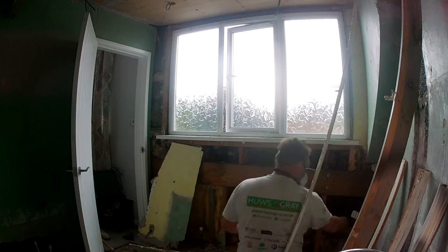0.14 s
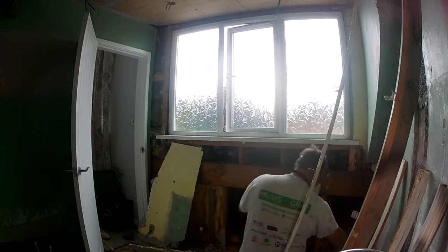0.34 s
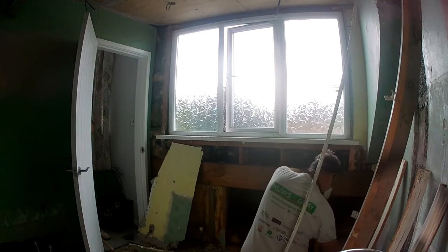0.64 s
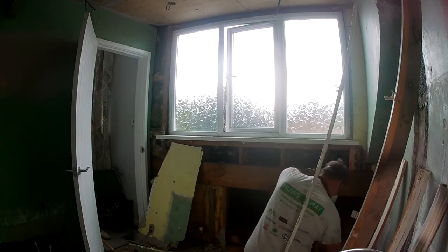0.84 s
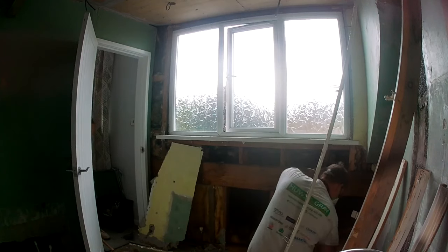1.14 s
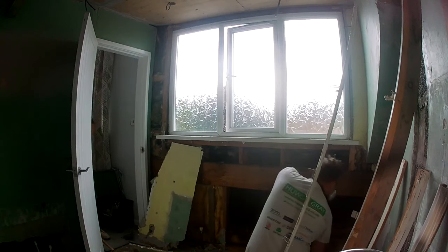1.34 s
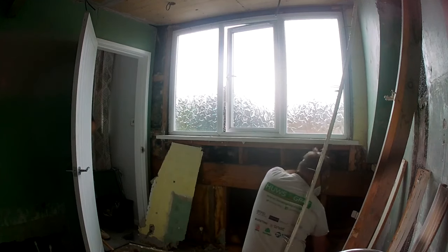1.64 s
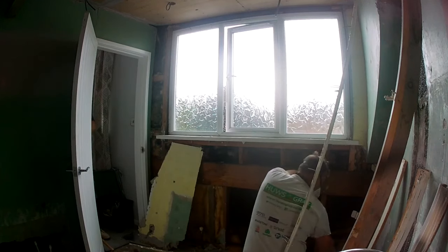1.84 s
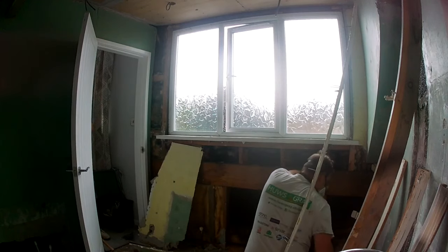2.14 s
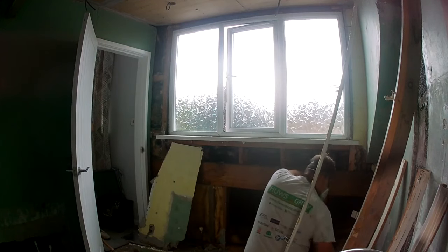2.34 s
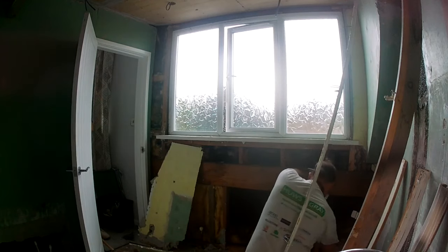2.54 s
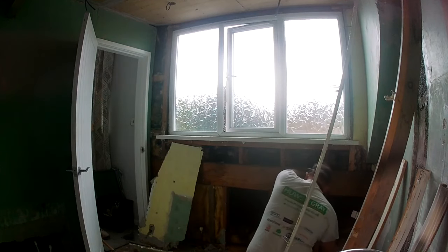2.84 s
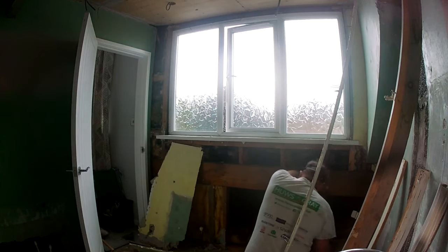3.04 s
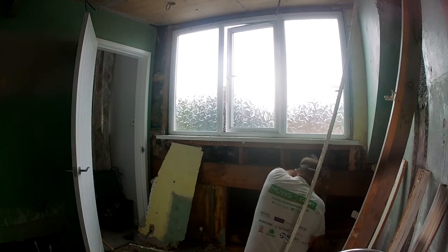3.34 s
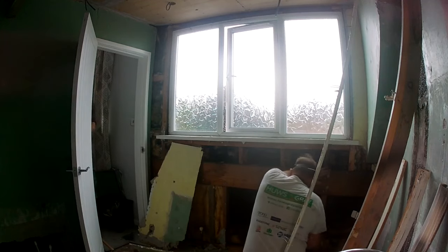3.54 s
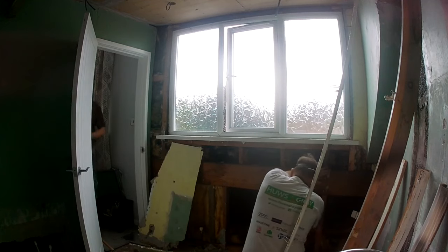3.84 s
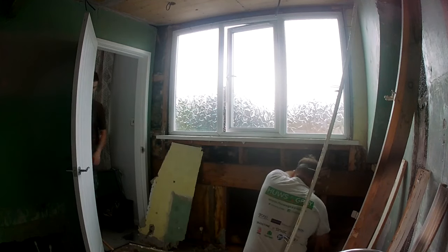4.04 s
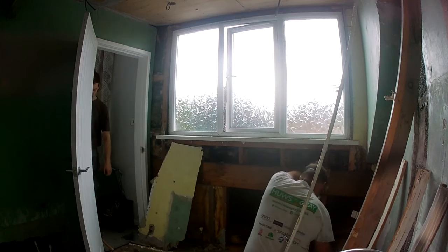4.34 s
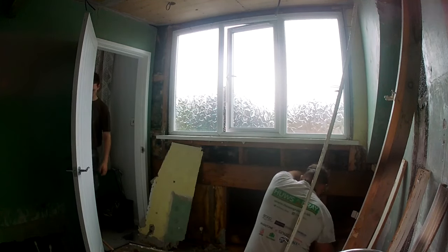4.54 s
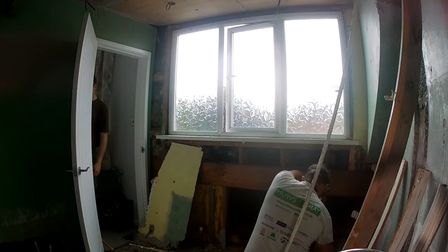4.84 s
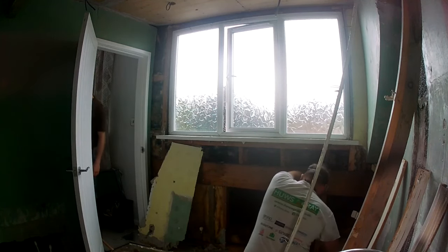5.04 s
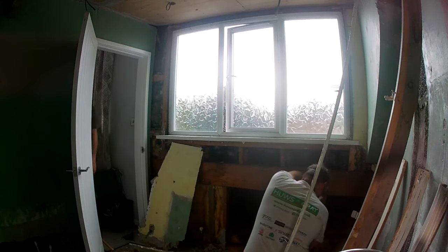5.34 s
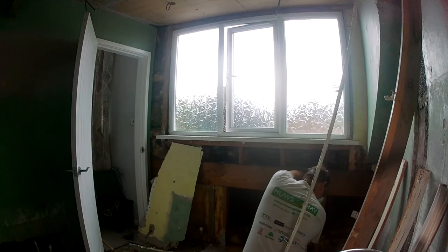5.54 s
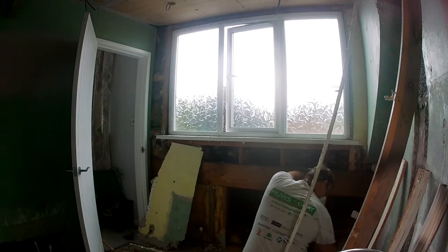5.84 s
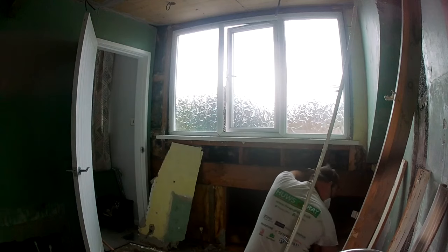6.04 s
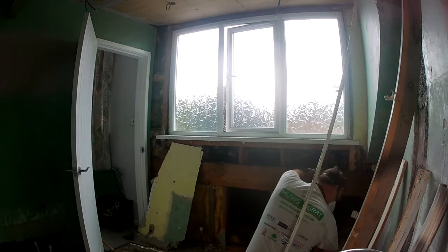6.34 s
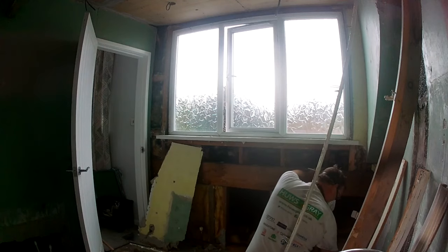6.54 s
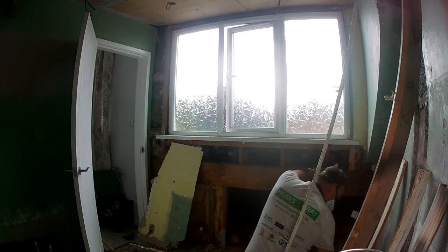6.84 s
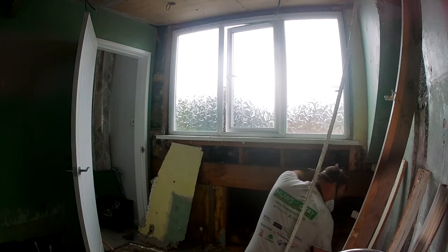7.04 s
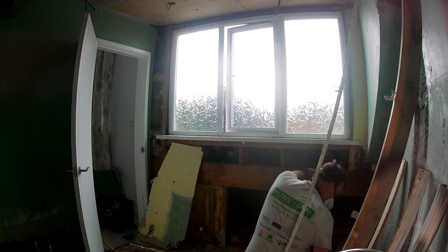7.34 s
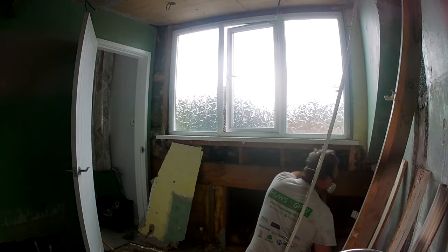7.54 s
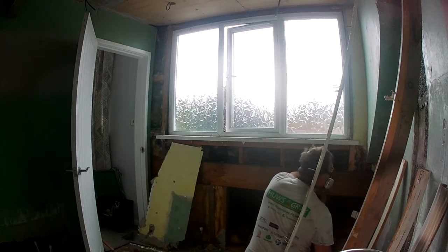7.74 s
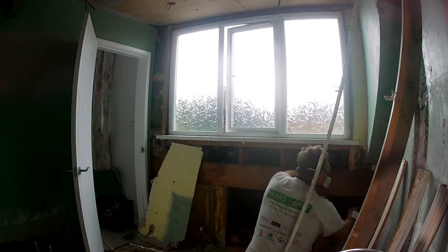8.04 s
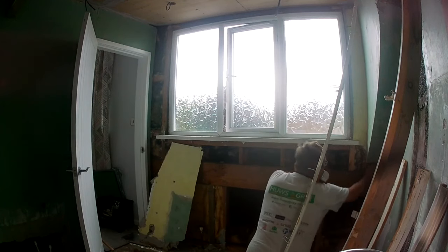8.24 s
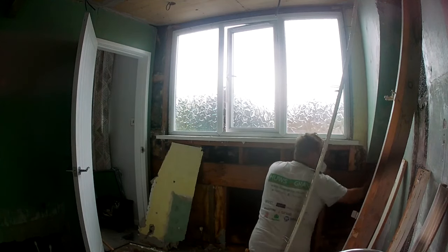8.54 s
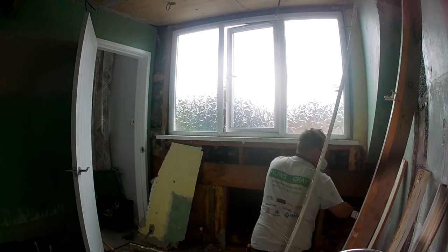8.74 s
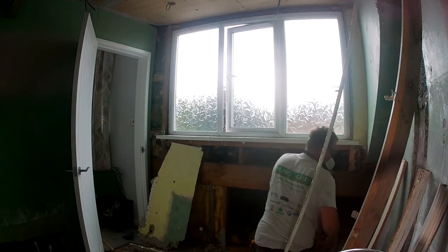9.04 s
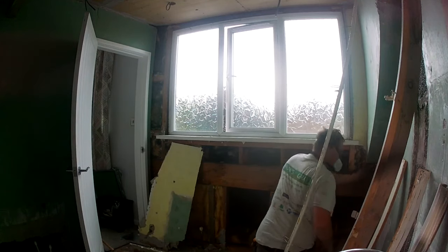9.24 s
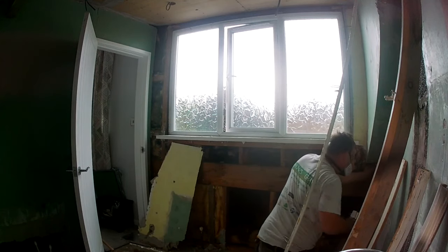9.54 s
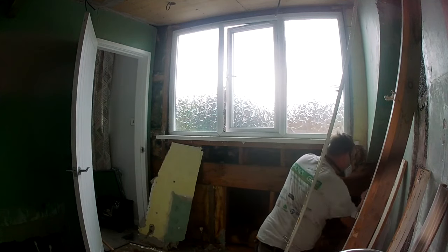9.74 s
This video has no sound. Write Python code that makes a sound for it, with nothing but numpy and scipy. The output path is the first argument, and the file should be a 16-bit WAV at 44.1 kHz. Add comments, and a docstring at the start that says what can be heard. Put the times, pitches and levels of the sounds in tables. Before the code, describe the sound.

Old wooden boards are knocked and pried loose in a bare room, with irregular dry thuds, cracks, short scrapes and quiet gaps.

```python
"""Prying old boards off a wall

Old boards are pried off a wall, knocked about and dragged in a bare room under renovation.
Modal synthesis: knocks, thumps and scrapes drive one set of decaying timber modes; filtered noise
adds cracks and grit. Squeaks ring single resonances, and noise tails make the room's reflections.
A closed microphone housing adds one treble resonance."""
import sys
import numpy as np
from scipy import signal
from scipy.fft import rfft, irfft, next_fast_len
from scipy.io import wavfile
from scipy.ndimage import uniform_filter1d

SR = 44100
rng = np.random.default_rng(int(sys.argv[2]) if len(sys.argv) > 2 else 0)


def file_out(sig):
    """Save sig as 16-bit WAV at sys.argv[1]."""
    # one column per channel
    cols = np.atleast_2d(sig).T
    # limit, then scale
    lim = np.clip(cols, -1, 1)
    pcm = np.round(lim * 32767).astype(np.int16)
    wavfile.write(sys.argv[1], SR, pcm)


def invert_db(level):
    """Linear amplitude ratio for a level in decibels (20 dB per decade), elementwise."""
    return 10 ** (np.asarray(level, dtype=float) / 20)


N = 436590

# Knocks on the boards: (time [s], strength [dB], pitch of the struck spot [Hz],
# crack [dB re strength], after-shudder [dB re strength])
KNOCKS = [(0.012, -30, 640, -15, -3), (0.017, -30, 1520, -12, -1), (0.089, -15, 1110, -20.5, -1),
          (0.226, -32, 1140, -14, -8), (0.267, -25, 1510, -25, -17.5), (0.288, -29, 1620, -14, -7),
          (0.463, -40.5, 1540, -10, 4), (0.478, -39, 1750, -8, -6), (0.515, -53, 1510, -18, -12),
          (0.615, -46.5, 1420, -1, 0), (0.998, -56, 584, -1, 9), (1.25, -42.5, 950, -17.5, 1.5),
          (1.337, -54.5, 503, -5, 2.5), (1.636, -51.5, 600, -1, 10), (1.684, -25, 1390, -14, -8),
          (1.696, -23.5, 870, -17, -6.5), (1.75, -35.5, 1550, -22, -16), (1.879, -37.5, 774, -21, -19),
          (2.075, -56, 805, -4, -12), (2.141, -48.5, 540, -16, 1), (2.203, -43.5, 714, -15, -1.5),
          (2.448, -56.5, 596, -44, -13), (2.615, -41.5, 1100, -24, 2), (2.782, -52, 900, -15, -1),
          (2.82, -55, 850, -3, -3), (2.845, -53, 1300, -12, -5), (3.139, -45, 1200, -3.5, -6),
          (3.172, -42.5, 600, -8, -17), (3.413, -62.5, 676, 10, -12), (3.524, -19.5, 1460, -3.5, -1),
          (3.548, -35, 1200, 1.5, -11), (3.578, -35, 1000, -4, -3), (3.6, -28, 900, -13, 1.5),
          (3.642, -19.5, 870, -11.5, -1), (3.662, -29, 1350, -12, 4.5), (3.708, -41, 1200, -19, -5),
          (3.733, -38, 800, -16, -9), (3.69, -29, 890, -24.5, 1), (4.296, -45, 1270, -6.5, -10),
          (4.469, -49, 563, -20, -3), (4.548, -35.5, 560, -17, -1.5), (4.634, -49, 1200, -12, 3),
          (4.604, -49, 593, -7, -10), (4.992, -38.5, 530, -10, -9), (5.017, -52, 600, -18, -10),
          (5.235, -52.5, 1380, -7.5, -4), (5.312, -54, 626, -3.5, -14), (5.667, -28.5, 710, -3, 1),
          (5.698, -13, 900, -8, 0.5), (5.707, -28.5, 1300, 3.5, -8), (5.715, -14, 930, -23, -8.5),
          (5.745, -21.5, 930, -27, 0), (5.96, -38, 500, -27, -9), (6.59, -45.5, 1360, -4, -2.5),
          (7.069, -47, 800, -2, 2), (7.167, -40, 900, -8, -8), (7.19, -35, 1500, -11, -8),
          (7.767, -49, 742, -19, -10), (7.784, -52.5, 566, -28.5, -9.5), (7.949, -49, 620, -26.5, 0),
          (7.978, -51, 570, -30, -7), (8.198, -59.5, 567, -1.5, -10), (8.347, -48, 535, -5.5, 2),
          (8.447, -51.5, 850, -3, -6), (8.528, -61, 1030, -10, 11), (8.61, -35.5, 610, -34, -16),
          (8.878, -33, 1300, -4.5, -14), (8.885, -33.5, 1000, -12.5, -12), (8.946, -38.5, 1110, 2, 0),
          (8.992, -32, 1450, -1, -12), (9.005, -38, 700, -9, -13), (9.045, -27, 670, -16.5, -3),
          (9.063, -28.5, 740, -13, -10), (9.108, -23.5, 690, -4.5, -9.5), (9.16, -26, 666, -35, 0.5),
          (9.254, -45, 620, -27, 8), (9.292, -40.5, 555, -3.5, -4), (9.398, -44.5, 544, -4, -1),
          (9.476, -29, 740, -21, -18), (9.644, -44, 845, -8.5, -26.5)]
# Thumps of timber into frame and floor: (time [s], strength [dB], deep thud [dB re strength],
# after-shudder [dB re strength], shudder t60 [s])
THUMPS = [(0.011, -25.5, -4.5, -0.5, 0.31), (0.085, -23.5, 1, 4, 0.28), (0.24, -30, -2, -9.5, 0.2),
          (0.267, -48, -12, -13, 0.18), (1.239, -41, 6.5, 4.5, 0.3), (1.333, -40.5, 2.5, -3.5, 0.38),
          (1.494, -36, -8, -3.5, 0.38), (1.532, -38, -10, -5.5, 0.22), (1.637, -31.5, 1, 1, 0.27),
          (1.682, -12, -11, -16, 0.19), (1.697, -13.5, -5.5, -21, 0.19), (1.8, -34, 2, -5, 1),
          (2.613, -29.5, 1, -3, 0.35), (2.739, -54, -22, 7.5, 0.37), (3.362, -67.5, 20, -31, 0.24),
          (3.528, -17, 4, 2.5, 0.4), (3.59, -24, 1.5, 5, 0.3), (3.715, -27, -2, 4, 0.27),
          (3.545, -28, 5, -10, 0.33), (3.635, -18.5, -9, 4.5, .3), (3.66, -18, -12, 3, 0.32),
          (3.759, -32, -1, -3, 0.25), (3.829, -24.5, -5.5, 5, 0.12), (4.055, -60, 23.5, -2, 0.38),
          (4.11, -60, 23, -6, 0.15), (4.41, -53, 8, -2, 0.2), (4.453, -35.5, 0, -1.5, 0.41),
          (4.509, -40, 5.5, 5.5, 0.37), (4.547, -35.5, 4.5, 6.5, 0.3), (4.605, -28.5, -7, -8, 0.16),
          (4.806, -47, -2, 6.5, 0.37), (4.86, -34, -4, -2.5, 0.35), (4.885, -48, 11.5, 6, 0.48),
          (4.992, -29, 3.5, -6, 0.31), (5.017, -32, 4, 1, 0.29), (5.667, -21.5, 1, 2.5, 0.51),
          (5.699, -16.5, -9, 3.5, 0.3), (5.747, -19, -10, -5, 0.12), (5.87, -38, 5, 4, 0.45),
          (5.959, -35, 0.5, 8, 0.21), (6.0, -40.5, 1, -3, 0.16), (6.098, -60, 5, 1, 0.18),
          (6.448, -43.5, 3.5, -20, 0.26), (7.049, -42.5, -12, 4, 0.68), (7.162, -39, -7, 2, .3),
          (7.282, -31.5, -21.5, 2.5, 0.22), (8.531, -49, 1.5, -2, 0.96), (8.697, -61, 1, 3, .6),
          (8.883, -47, -34, 6.5, 0.41), (9.048, -44, -20, 1, .15), (9.107, -35, 2, 7, 0.17)]
# Scrapes, drags and creaks: (start [s], length [s], top [dB], heft [dB re top], grit [dB re top])
SCRAPES = [(0.14, 0.2, -49, -7, 5.5), (0.31, 0.32, -57, -2, 11), (0.6, 0.068, -50.5, -4, -2),
           (1.33, 0.42, -52.5, 3.5, -9), (1.74, 0.3, -41.5, 11, -11), (1.839, 0.14, -42.5, 15, -5),
           (2.05, 0.17, -47, -19, -11), (2.699, 0.27, -54, -4, -2), (2.81, 0.29, -52.5, -17, -4),
           (3.13, 0.19, -54, 5.5, -15), (3.451, 0.5, -51, -1, 5.5), (3.54, 0.2, -23, -7, -6),
           (3.64, 0.12, -28.5, 7, -14), (3.719, 0.22, -34, 7.5, -15.5), (4.29, 0.32, -46.5, -10.5, -1.5),
           (4.44, 0.3, -41.5, -3, -7.5), (4.612, 0.17, -57, -3, 10.5), (4.98, 0.11, -32.5, 9.5, -11.5),
           (5.155, 0.21, -52.5, -5, 3.5), (5.35, 0.35, -58, -18, -4), (5.72, 0.42, -34.5, 2, -16),
           (5.9, 0.43, -45.5, -16, -1), (6.141, 0.57, -59, -3.5, 3.5), (6.5, 0.54, -57, 0, 1.5),
           (6.82, 0.6, -64, -5, 1.5), (7.062, 0.54, -37, 1.5, -7.5), (8.15, 0.33, -55, -3.5, -9),
           (8.35, 0.71, -55.5, 0, -4.5), (8.66, 0.56, -61, 7.5, -18), (8.869, 0.11, -42, -11, -2.5),
           (9.094, 0.17, -33.5, -7, 0.5), (9.27, 0.73, -44.5, -9.5, -7.5), (9.47, 0.3, -57, -26, -25),
           (9.63, 0.18, -59.5, -17, 8)]
# Short squeaks and scuffs: (start [s], length [s], pitch [Hz], ring t60 [s], level [dB])
SQUEAKS = [(0.25, 0.024, 1500, 0.057, -39), (0.3, 0.039, 933, 0.06, -47),
           (1.677, 0.033, 1490, 0.021, -39.5), (1.708, 0.043, 231, 0.038, -30),
           (5.699, 0.09, 3710, 0.006, -59), (0.017, 0.014, 1600, 0.038, -44.5),
           (5.178, 0.018, 760, 0.034, -55), (5.195, 0.025, 1260, 0.03, -53),
           (5.21, 0.015, 1700, 0.02, -57.5), (2.715, 0.04, 1500, 0.02, -56),
           (2.73, 0.032, 970, 0.022, -54.5), (2.778, 0.03, 315, 0.04, -48), (2.83, 0.039, 314, 0.04, -52.5),
           (4.995, 0.031, 1200, 0.026, -47.5), (4.46, 0.199, 316, 0.05, -47.5),
           (3.8, 0.08, 162, 0.11, -36.5), (7.09, 0.12, 1460, 0.02, -46), (7.26, 0.044, 1420, 0.023, -47),
           (7.075, 0.06, 770, 0.044, -49.5), (7.135, 0.1, 880, 0.029, -44.5),
           (7.192, 0.083, 168, 0.19, -38.5), (9.042, 0.026, 700, 0.01, -39),
           (9.134, 0.022, 1650, 0.032, -41.5), (9.153, 0.034, 590, 0.016, -40),
           (9.72, 0.016, 1110, 0.029, -52.5), (3.641, 0.023, 4060, 0.0058, -56),
           (5.948, 0.0049, 4130, 0.0078, -58.5), (8.622, 0.07, 1880, 0.022, -61),
           (9.478, 0.03, 1930, 0.006, -48), (9.56, 0.018, 1900, 0.032, -56), (9.45, 0.085, 700, 0.2, -49),
           (9.703, 0.036, 4160, 0.0018, -66)]
# Hands and feet moving among the boards: (time [s], level [dB])
HANDLING = [(0, -40), (.75, -67.5), (1.2, -60.5), (2.3, -61.5), (2.42, -72.5), (3.1, -63.5), (3.9, -57.5),
            (4.1, -78), (4.3, -60.5), (5.6, -60), (6.9, -60), (7.5, -65.5), (7.9, -67.5), (8.1, -75),
            (8.8, -63), (9.7, -64.5), (9.9, -103)]
# Handling's share in each group: (thud [dB], body [dB], board [dB], edge [dB], grit [dB])
HANDLING_SHARE_DB = [-4.5, -3.5, 1.5, -2, -7]
# Timber and floor modes: (frequency [Hz], level [dB], t60 [s])
TIMBER = [(49.7, -5.5, 0.1), (60, -20, 0.19), (76.7, 3.5, 0.14), (99.2, -1, 0.23), (161.7, 1.5, 0.1),
          (244, 1.5, 0.032), (266.8, -1.5, 0.1), (301.8, -1.5, 0.05), (449.9, -1.5, 0.018),
          (456, -5, 0.079), (563, 7, 0.035), (604.6, 6.5, 0.056), (716, 7, 0.019), (797, 9, 0.017),
          (804.3, 11.5, 0.021), (951, 6.5, 0.026), (1081, 7.5, 0.012), (1270, 6.5, 0.012),
          (1257, 3.5, 0.021), (1445, -2.5, 0.015), (1605, -3.5, 0.023), (1920, -14, 0.023),
          (2215, -21.5, 0.059), (2420, -23.5, 0.18)]
# Frequencies that part the modes into groups: (thud to body [Hz], body to board [Hz], board to edge [Hz])
GROUP_EDGES_HZ = [130, 450, 1000]
# Gain of all blows by group: (thud [dB], body [dB], board [dB], edge [dB], crack [dB])
BLOW_GAIN_DB = [-7, -6, -5.5, -4.5, 7]
# Gain of all rubbing by group: (thud [dB], body [dB], board [dB], edge [dB], grit [dB])
RUB_GAIN_DB = [-7, -4.5, -9, -6, 2.5]
# What a knock passes on to the low groups: (thud [dB re strength], body [dB re strength])
KNOCK_LOW_DB = [-32.5, -23.5]
# Spectral shape of crack and grit: (frequency [Hz], relative density [dB per Hz])
CRACK_SPECTRUM = [(1500, 7), (2000, -6.5), (2600, -9.5), (3200, -19), (4200, -23.5), (4900, -25.5),
                  (6000, -28.5), (7500, -44.5), (9000, -62), (15000, -76.5)]
# Spectral shape of the air of the house: (frequency [Hz], relative density [dB per Hz])
AIR_SPECTRUM = [(15, 3.5), (25, 15.5), (61, 6.5), (204, -5.5), (297, -2.5), (410, -9), (722, -7.5),
                (1530, -18.5), (1950, -21), (3170, -31.5), (3830, -38), (6550, -36.5), (15500, -49)]
# Decay of the room's reflections: (frequency [Hz], t60 [s])
ROOM_T60 = [(60, 0.3), (250, 0.2), (1000, 0.34), (4000, 0.39), (12000, 0.096)]

AIR_DB = -62
ROOM_DB, ROOM_LOW_HZ, SPOT_CHANGE_S = -7, 117, 0.12
HOUSING_HZ, HOUSING_WIDTH_HZ, HOUSING_DB = 3780, 450, 8
BASS_CUT_HZ = 43
FIZZ_HZ, FIZZ_DB = 6460, -24.5
JUDDER_HZ = 29
THUMP_HIGH_DB = -31   # what a thump passes on to the boards, and again from them to the crack
HEAVY_RATTLE_DB = -7.5   # heavy timber feels mostly the first contact
CRACK_RISE_S = 0.002   # time constant of each of two smoothing stages
SHUDDER_RISE_S, KNOCK_SHUDDER_T60_S, THUMP_RISE_S = 0.012, 0.24, 0.016
# Knock shudder: gain at the spot's pitch, loss away from it, grit beyond the crack
SHUDDER_SPOT_DB, SHUDDER_DB_PER_OCTAVE, SHUDDER_GRIT_DB = 1, 4, -10
SCRAPE_RISE_SHARE, SCRAPE_FALL_DB = 0.2, 29.5   # share of the length; fall from the top to the end
SCRAPE_THUD_DB, SCRAPE_EDGE_DB = -9.5, -3   # thud re heft, edge re top

MODES_HZ = np.array(TIMBER)[:, 0]
MODE_GROUP = np.searchsorted(GROUP_EDGES_HZ, MODES_HZ)   # 0 thud, 1 body, 2 board, 3 edge
RUB_GROUP = np.r_[MODE_GROUP, 4]   # every mode, then grit
RUB_TIME_S = np.arange(0, N + 40, 40) / SR   # slow time grid for rubbing strength


def rms_one(x):
    """Power normalisation: scale to rms 1."""
    return x / np.sqrt(np.mean(x ** 2) + 1e-20)


def at_hz(points, hz):
    """Logarithmic frequency scale: read a (Hz, value) table between its points."""
    return np.interp(np.log(hz), np.log(np.array(points)[:, 0]), np.array(points)[:, 1])


def coloured(x, spectrum):
    """Spectral shaping: weight each frequency, keeping the rms of white noise."""
    size = next_fast_len(len(x))
    hz = np.arange(size // 2 + 1) * SR / size + 1
    gain = invert_db(at_hz(spectrum, hz))
    return irfft(rfft(x, size) * rms_one(gain), size)[:len(x)]


def ring(force, hz, t60):
    """Damped resonance: a unit click sets off a sine decaying from height 1."""
    r, w = invert_db(-60 / (t60 * SR)), 2 * np.pi * hz / SR
    return signal.lfilter([0, np.sin(w)], [1, -2 * r * np.cos(w), r * r], force + 1e-18)


def slips(per_s, spread_db, judder_db):
    """Stick-slip friction: random clicks of uneven size that come in clumps, rms 1."""
    sizes = invert_db(spread_db * np.minimum(rng.exponential(1, N), 5)) * rng.choice([-1, 1], N)
    slow = signal.butter(2, JUDDER_HZ, fs=SR)
    judder = rms_one(signal.lfilter(*slow, rng.standard_normal(N)))
    occurs = rng.random(N) < per_s / SR
    return rms_one(sizes * invert_db(judder_db * judder) * occurs)


def handling_power():
    """Continuous friction: hands and feet rub every mode at a slowly varying level."""
    level_db = np.interp(RUB_TIME_S, *np.transpose(HANDLING))
    return invert_db(level_db + np.array(HANDLING_SHARE_DB)[RUB_GROUP][:, None]) ** 2


def timber_modes(at, sizes, spot_hz, blow_db, rubbing):
    """Modal superposition: contacts and slips drive the same damped timber modes."""
    caught = slips(per_s=1300.0, spread_db=3.0, judder_db=0.5)
    place_db = 2 * rng.standard_normal((len(spot_hz), len(TIMBER)))   # each spot favours other modes
    out = np.zeros(N)
    for k, (hz, level_db, t60) in enumerate(TIMBER):
        group = MODE_GROUP[k]
        # Steady drive piles up: scale it so that a group's modes share unit power before their levels
        share = np.sqrt(4 * np.log(1000) / (t60 * SR * np.sum(MODE_GROUP == group)))
        force = share * rubbing[k] * caught
        # Board and edge modes weaken by octaves away from the spot's pitch
        away_db = -13.0 * np.abs(np.log2(hz / spot_hz)) * (hz > GROUP_EDGES_HZ[1])
        later = np.arange(sizes.shape[1]) > 0
        felt = sizes * invert_db(HEAVY_RATTLE_DB * later * (group < 2))
        np.add.at(force, at, felt * invert_db(blow_db[:, group] + place_db[:, k] + away_db)[:, None])
        soft = signal.butter(2, 3.1 * hz, fs=SR)   # wood yields: no contact is a sharp click
        out += (-1) ** k * invert_db(level_db) * ring(signal.lfilter(*soft, force), hz, t60)
    return out


def grit(strength):
    """Friction noise: dense fine slips follow the strength of the rubbing."""
    return strength * slips(per_s=6400.0, spread_db=1.5, judder_db=1.8)


def room(x, count=5):
    """Diffuse reverberation: octave noise tails swell and die; the work moves, so their pattern changes."""
    t, out = np.arange(SR) / SR, np.zeros(N)
    spot = np.arange(N) / SR / SPOT_CHANGE_S
    for k in range(count):
        tail = 0
        for low in 30 * 2.0 ** np.arange(9):
            octave = signal.butter(2, [low, 2 * low], "band", fs=SR, output="sos")
            band = signal.sosfilt(octave, rng.standard_normal(SR))
            tail = tail + band * invert_db(-60 * t / at_hz(ROOM_T60, low * np.sqrt(2)))
        swell = 1 - np.exp(-t / 0.0081)
        tail = signal.lfilter(*signal.butter(1, ROOM_LOW_HZ, "high", fs=SR), tail * swell)
        distance = np.abs((spot - k + count / 2) % count - count / 2)
        here = np.sqrt(np.clip(1 - distance, 0, 1))   # equal-power crossfade between spots
        out += signal.fftconvolve(x * here, tail / np.sqrt(np.sum(tail ** 2)))[:N]
    return out


def house_air():
    """Stationary noise: white noise shaped into the quiet air of the house."""
    return invert_db(AIR_DB) * coloured(rng.standard_normal(N), AIR_SPECTRUM)


def thump_blows():
    """Impact of heavy timber: most force goes low. Gives times, pitches and group levels."""
    s, db, deep_db, _, _ = np.transpose(THUMPS)
    high_db = db + THUMP_HIGH_DB
    levels_db = np.c_[db + deep_db, db, high_db, high_db, high_db + THUMP_HIGH_DB]
    return s, 0 * s + GROUP_EDGES_HZ[1], levels_db + BLOW_GAIN_DB


def shudder(s, rise_s, t60):
    """Transient vibration: rubbing swells in quickly after a blow, then dies exponentially."""
    since = np.clip(RUB_TIME_S - s, 0, None)
    return np.minimum(since / rise_s, 1) * invert_db(-60 * since / t60)


def thump_shudder_power():
    """Forced rubbing after a thump: only the thud and body modes take it up."""
    power = np.zeros((len(RUB_GROUP), len(RUB_TIME_S)))
    low = RUB_GROUP < 2
    for s, db, deep_db, after_db, t60 in THUMPS:
        level_db = db + after_db + np.where(RUB_GROUP[low] == 0, deep_db, 0)
        power[low] += (invert_db(level_db)[:, None] * shudder(s, THUMP_RISE_S, t60)) ** 2
    return power


def knock_blows():
    """Impact on a board: a weak share passes to the low modes. Gives times, pitches and group levels."""
    s, db, hz, crack_db, _ = np.transpose(KNOCKS)
    levels_db = np.c_[db + KNOCK_LOW_DB[0], db + KNOCK_LOW_DB[1], db, db, db + crack_db]
    return s, hz, levels_db + BLOW_GAIN_DB


def contacts(s, rattle_s, spread_db, count=10):
    """Repeated impact: a blow rattles, weaker towards its end. Gives sample positions and signed sizes."""
    chance = rng.random((len(s), 3, count))
    later = chance[:, 0] * (np.arange(count) > 0)
    at = ((s[:, None] + later * rattle_s) * SR).astype(int)
    heights = invert_db(-spread_db * (chance[:, 1] + later + 0.6) * (later > 0))
    signs = np.where(later > 0, np.sign(chance[:, 2] - 0.5), -1)   # the first contact is always inward
    return np.minimum(at, N - 1), heights * signs


def cracks(at, sizes, crack_db):
    """Fracture noise: fibres give way over a few ms, a decaying burst of dense clicks."""
    snaps = np.zeros(N)
    np.add.at(snaps, at, np.abs(sizes) * invert_db(crack_db)[:, None])
    hold = np.exp(-1 / (CRACK_RISE_S * SR))
    yielding = signal.lfilter([1 - hold], [1, -hold], snaps)
    tearing = signal.lfilter([0.015], [1, -hold], yielding)
    envelope = signal.lfilter([1], [1, -invert_db(-60 / (0.02 * SR))], tearing)
    return envelope * slips(per_s=8000.0, spread_db=2.5, judder_db=0.65)


def knock_shudder_power():
    """Forced rubbing after a knock: board and edge modes near the spot's pitch shudder most."""
    power = np.zeros((len(RUB_GROUP), len(RUB_TIME_S)))
    for s, db, hz, crack_db, after_db in KNOCKS:
        loss_db = -SHUDDER_DB_PER_OCTAVE * np.abs(np.log2(MODES_HZ / hz))
        near_db = np.where(MODES_HZ > GROUP_EDGES_HZ[1], loss_db, -99)
        level_db = db + after_db + np.r_[near_db + SHUDDER_SPOT_DB, crack_db + SHUDDER_GRIT_DB]
        power += (invert_db(level_db)[:, None] * shudder(s, SHUDDER_RISE_S, KNOCK_SHUDDER_T60_S)) ** 2
    return power


def squeaks():
    """Friction-driven resonance: uneven slipping rings one mode during the stroke, then stops short."""
    t, out = np.arange(N) / SR, np.zeros(N)
    for s, length, hz, t60, level_db in SQUEAKS:
        rise = np.clip((t - s) / 0.0056, 0, 1)
        fade = np.exp(-np.clip(t - s - length, 0, 1) / 0.0066)
        out += invert_db(level_db) * rise * fade * rms_one(ring(rng.standard_normal(N), hz, t60))
    return out


def scrape_power():
    """Sliding friction: each stroke rises to its top, then falls evenly in dB."""
    power = np.zeros((len(RUB_GROUP), len(RUB_TIME_S)))
    for s, length, db, heft_db, grit_db in SCRAPES:
        along = np.clip(RUB_TIME_S - s, 0, None) / length
        fall = (along - SCRAPE_RISE_SHARE) / (1 - SCRAPE_RISE_SHARE)
        stroke = np.minimum(along / SCRAPE_RISE_SHARE, invert_db(-SCRAPE_FALL_DB * fall))
        group_db = np.array([heft_db + SCRAPE_THUD_DB, heft_db, 0, SCRAPE_EDGE_DB, grit_db])
        power += (invert_db(db + group_db[RUB_GROUP])[:, None] * stroke) ** 2
    return power


def rub_strength():
    """Incoherent addition: handling, shudders and scrapes add in power for each mode and the grit."""
    power = handling_power() + thump_shudder_power() + knock_shudder_power() + scrape_power()
    t = np.arange(N) / SR
    return [invert_db(RUB_GAIN_DB[g]) * np.interp(t, RUB_TIME_S, np.sqrt(p)) for p, g in zip(power, RUB_GROUP)]


def boards():
    """Excitation and response: blows and rubbing drive the modes; crack and grit lie above them."""
    thumps, knocks = thump_blows(), knock_blows()
    s, spot_hz, blow_db = [np.concatenate(pair) for pair in zip(thumps, knocks)]
    rubbing = rub_strength()
    at, sizes = contacts(s, rattle_s=0.025, spread_db=7.5)
    ringing = timber_modes(at, sizes, spot_hz, blow_db, rubbing)
    rough = cracks(at, sizes, blow_db[:, 4]) + grit(rubbing[-1])
    treble = signal.sosfilt(signal.butter(4, 1500, "high", fs=SR, output="sos"), rough)
    return ringing + coloured(treble, CRACK_SPECTRUM)


def scene():
    """Superposition: boards and squeaks, their reflections and the quiet air of the house."""
    wood = boards() + squeaks()
    return (wood + invert_db(ROOM_DB) * room(wood) + house_air())[None]


def housing(dry):
    """Port resonance: the microphone housing lifts a narrow treble band; the deepest bass is cut."""
    r, w = np.exp(-np.pi * HOUSING_WIDTH_HZ / SR), 2 * np.pi * HOUSING_HZ / SR
    port = signal.lfilter([(1 - r * r) / 2, 0, (r * r - 1) / 2], [1, -2 * r * np.cos(w), r * r], dry)
    bass_cut = signal.butter(2, BASS_CUT_HZ, "high", fs=SR, output="sos")
    return signal.sosfilt(bass_cut, dry + invert_db(HOUSING_DB) * port)


def fizz(heard):
    """Amplitude modulation: faint high noise follows the short-term rms of the sound's slope."""
    loudness = np.sqrt(uniform_filter1d(np.diff(heard, prepend=0) ** 2, size=1200) + 1e-18)
    high = signal.butter(4, FIZZ_HZ, "high", fs=SR, output="sos")
    return invert_db(FIZZ_DB) * signal.sosfilt(high, loudness * rng.standard_normal(N))


def low_pass(x):
    """Removes everything above the highest recorded frequency."""
    return signal.sosfilt(signal.butter(12, 15710, fs=SR, output="sos"), x)


def record(dry):
    """Signal chain: the housing colours the sound, and a faint fizz rides on it."""
    heard = housing(dry)
    mix = heard + fizz(heard)
    return low_pass(mix)


dry = scene()
out = record(dry)
file_out(out)
```